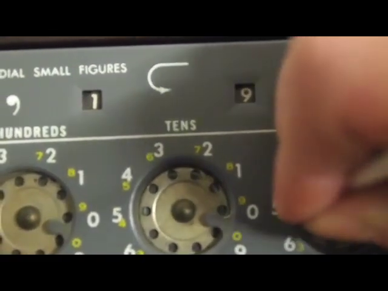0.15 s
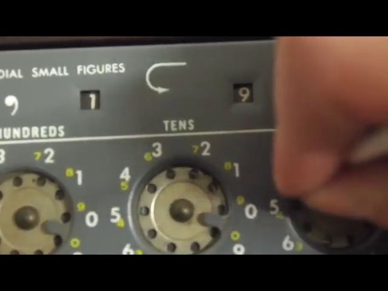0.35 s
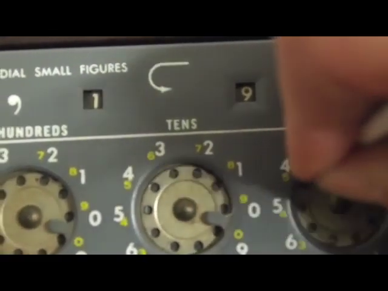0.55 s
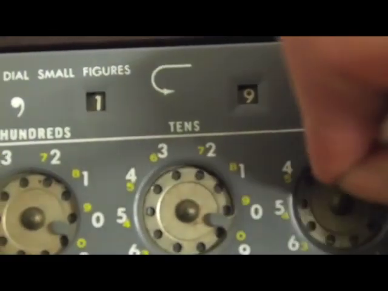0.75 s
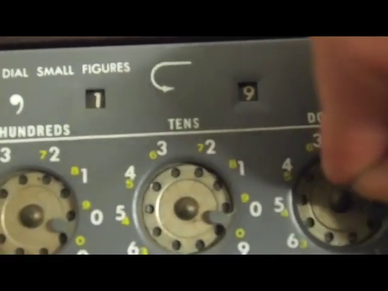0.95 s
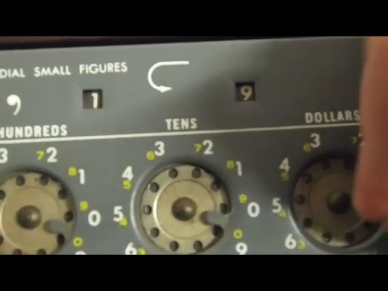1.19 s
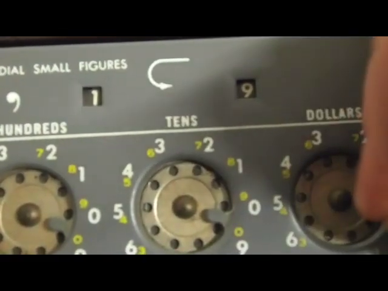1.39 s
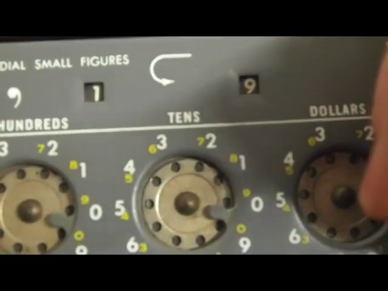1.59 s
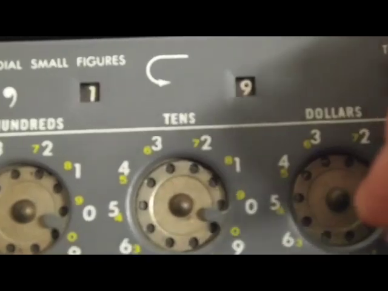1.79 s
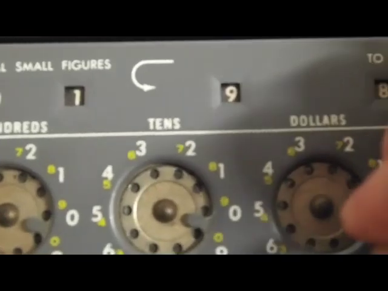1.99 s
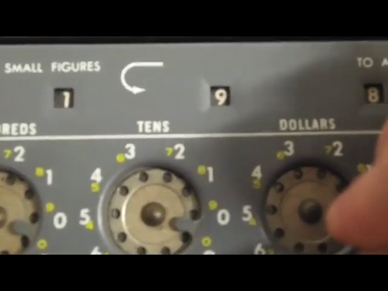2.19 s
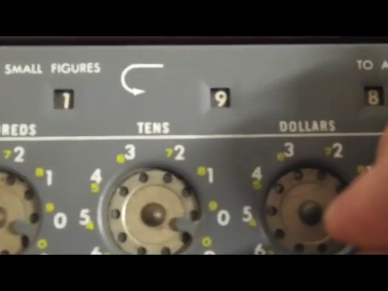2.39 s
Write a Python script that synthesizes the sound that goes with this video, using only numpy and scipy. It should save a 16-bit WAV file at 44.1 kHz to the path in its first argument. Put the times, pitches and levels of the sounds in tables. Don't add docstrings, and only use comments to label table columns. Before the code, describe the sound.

Mechanical adding machine dial ratcheting, close in a quiet room with steady microphone hiss. Sharp, irregular metal clicks and faint scraping run from 0.1 to 0.7 seconds. A hard hollow knock lands at 0.74, bright clacks at 0.82, another ringing knock at 0.92. A loud clattering burst follows at 1.1-1.27. After a pause, a soft fingertip tap at 1.77, faint rubbing, and a dull tick at 2.22.

```python
import sys
import numpy as np
from scipy import signal
from scipy.fft import rfft, irfft, next_fast_len
from scipy.io import wavfile
from scipy.ndimage import map_coordinates

SR = 44100
rng = np.random.default_rng(int(sys.argv[2]) if len(sys.argv) > 2 else 0)


def pcm_store(signal):
    levels = np.round(np.clip(np.atleast_2d(signal), -1, 1) * 32767)
    wavfile.write(sys.argv[1], SR, levels.astype(np.int16).T)


def invert_db(level):
    return 10 ** (np.asarray(level, dtype=float) / 20)


N = 108045

# [f/Hz, width/Hz, level/dB]
GEARS = [(1850, 650, -4), (3315, 800, 4), (4277, 190, 3.5), (5164, 700, 7.5), (7200, 3700, -10),
         (8540, 370, 2), (10440, 1900, -7), (11780, 5700, -4)]
FLAT_DB = -7


def unit(x):
    return x / np.sqrt(np.mean(x ** 2) + 1e-20)


def along(points, hz):
    f, v = np.transpose(points)
    return np.interp(np.log(hz + 1), np.log(f + 1), v)


def level(rows):
    s, db = np.transpose(rows)
    return invert_db(np.interp(np.arange(N) / SR, s, db, left=-150, right=-150))


def wobble(rate):
    return map_coordinates(rng.standard_normal(int(N * rate / SR) + 4), [np.arange(N) * rate / SR])


def filtered(x, response):
    m = next_fast_len(x.shape[-1] + 8192)
    spectrum = rfft(x, m) * response(np.fft.rfftfreq(m, 1 / SR))
    return irfft(spectrum, m)[..., :x.shape[-1]]


def bass_cut(f, corner_hz):
    return 1j * f / (corner_hz + 1j * f)


def body(peaks, tilt=0, extra_db=0, flat_db=-100):
    c, w, db = np.transpose(peaks)[..., None]
    gains = (-1.) ** np.arange(len(c))[:, None] * invert_db(db + extra_db)
    below = 0.29

    def response(f):
        octaves = np.log2((f + 400) / 4400)
        bend = np.maximum(octaves, 0) + below * np.minimum(octaves, 0)
        slope = invert_db(np.clip(tilt, -14, 8) * bend)
        modes = np.sum(gains * 1j * f * w / (c * c - f * f + 1j * f * w), axis=0)
        return slope * (modes + invert_db(flat_db) * bass_cut(f, 1500))

    return response


def snaps(events, peaks, ping_width, ping_db):
    spiky_db, scatter_db = 1.5, 2
    strike_t60, rise_s = 0.0024, 0.00037
    out, t = np.zeros(N + SR), np.arange(4096) / SR
    for s, db, tilt, t60, ping_hz in events:
        unevenness = np.repeat(rng.standard_normal(len(t) // 16), 16)
        spikes = rng.standard_normal(len(t)) * invert_db(spiky_db * unevenness)
        decay = invert_db(-60 * t / t60) + invert_db(-60 * t / strike_t60)
        burst = spikes * decay * (1 - np.exp(-t / rise_s))
        metal = body(peaks, tilt, scatter_db * rng.standard_normal((len(peaks), 1)), FLAT_DB)
        ping = body([(ping_hz, ping_width, ping_db)], tilt)
        ring = filtered(burst, lambda f: (metal(f) + ping(f)) * bass_cut(f, 940) ** 2)
        out[round(s * SR):][:len(t)] += invert_db(db - 9) * ring / np.sqrt(np.mean(ring[:200] ** 2))
    return out[:N]


def room(x):
    # [f/Hz, t60/s]
    decay_times = [(200, 0.32), (1500, 0.37), (5000, 0.36), (12000, 0.32)]
    delay_s = 0.004
    hz, t, z = signal.stft(rng.standard_normal(SR // 2), SR, nperseg=256)
    fading = z * invert_db(-60 * t / along(decay_times, hz)[:, None])
    tail = signal.istft(fading, SR, nperseg=256)[1]
    late = np.pad(x, (round(delay_s * SR), 0))
    return signal.fftconvolve(late, tail / np.linalg.norm(tail))[:N]


def microphone_hiss():
    # [f/Hz, level/dB per Hz]
    colour = [(15, -54), (25, -16), (309, -5), (363, -6.5), (403, -3.5), (666, -6.5), (1050, -6),
              (12600, -12.5), (14000, -8.5)]
    return invert_db(-57) * unit(filtered(rng.standard_normal(N), lambda f: invert_db(along(colour, f))))


def scrape():
    # [t/s, length/s, level/dB, tilt/dB per octave, squeak f/Hz]
    strokes = [(-.03, 0.085, -49, -3.5, 3380), (0.087, 0.18, -53.5, -8, 4020),
               (0.158, 0.028, -50.5, -4, 4300), (0.225, 0.059, -45, -12, 3140),
               (0.326, 0.13, -40.5, -7, 3080), (0.45, 0.079, -57, -8, 3200), (0.517, 0.1, -50.5, -12, 3020),
               (0.587, 0.12, -48.5, -14, 1930), (0.688, 0.061, -49, -11, 2600),
               (0.754, 0.11, -46, -6, 1630), (0.84, 0.056, -55, 13, 5300), (0.917, 0.083, -60, -15, 3400),
               (1.086, 0.034, -42.5, -4.5, 5500), (1.132, 0.052, -40.5, -11.5, 5200),
               (1.169, 0.086, -30, -3.5, 5340), (1.232, .11, -45.5, 0, 1500)]
    # [f/Hz, width/Hz, level/dB]
    shake_modes = [(45, 57, -2), (126, 22, 10), (226, 95, 0)]
    grain_db, shake_db = 2.2, -19.5
    edge = 0.36
    squeak_width_hz, squeak_db = 220, 9.5
    t, out, effort = np.arange(N) / SR, np.zeros(N), np.zeros(N)
    grains = rng.standard_normal(N) * invert_db(grain_db * (wobble(370) + wobble(99.94)))
    for s, length, db, tilt, squeak_hz in strokes:
        nearest_end = np.minimum(t - s, s + length - t)
        stroke = invert_db(db) * np.clip(nearest_end / (edge * length), 0, 1)
        teeth = body(GEARS + [(squeak_hz, squeak_width_hz, squeak_db)], tilt, 0, FLAT_DB)
        out += stroke * unit(filtered(grains, teeth))
        effort += np.sqrt(stroke * invert_db(-52.5))
    shaking = unit(filtered(rng.standard_normal(N), body(shake_modes)))
    return out + invert_db(shake_db) * effort * shaking


def case_hum():
    # [t/s, peak level/dB, f/Hz, t60/s]
    jolts = [(0, -56, 647, 0.082), (.202, -50.5, 636, .04), (.345, -48, 646, 0.064), (.41, -45, 709, 0.042),
             (.635, -47.5, 630, 0.038), (.819, -41.5, 654, 0.065), (.848, -47, 638, 0.038),
             (1.118, -51, 640, 0.075), (1.173, -36.5, 642.6, 0.093), (1.2, -44.5, 650, 0.07),
             (1.233, -39, 642, 0.079), (1.278, -41.5, 664, 0.028)]
    rise_s, rough_db = 0.0043, 3
    out, t = np.zeros(N + SR), np.arange(8192) / SR
    for s, db, hz, t60 in jolts:
        swell = invert_db(db - 60 * t / t60) * (1 - np.exp(-t / rise_s))
        out[round(s * SR):][:len(t)] += swell * np.sin(2 * np.pi * hz * t)
    return 2 * out[:N] * invert_db(rough_db * wobble(120.14))


def winding():
    # [t/s, peak level/dB, tilt/dB per octave, rattle t60/s, ping f/Hz]
    pawls = [(0.0893, -22, 1.5, 0.019, 4870), (0.0935, -27.5, 0, 0.035, 4400),
             (0.1258, -38, 3, 0.027, 2840), (0.1985, -22.5, 1, 0.05, 5800), (0.2015, -26, -5, 0.018, 4800),
             (0.2072, -30, -0.5, 0.016, 5550), (0.2298, -47, 10, 0.027, 4430), (0.245, -27, 4, 0.064, 5550),
             (0.2548, -24, 2, 0.013, 3100), (0.2568, -19.5, -0.5, 0.02, 10050),
             (0.3292, -23.5, 3.5, 0.015, 5600), (0.3444, -31.5, -5, 0.027, 3180),
             (0.3704, -30, -4.5, 0.035, 3140), (0.3875, -28, -1, 0.024, 5200),
             (0.3905, -17, -1.5, 0.025, 5240), (0.4025, -21.5, 2.5, 0.083, 5100),
             (0.41, -19.5, 0, 0.023, 4330), (0.4354, -37, 11.5, 0.029, 5560),
             (0.4544, -33.5, -3.5, 0.028, 5330), (0.4914, -29.5, 1, 0.049, 5450),
             (0.5497, -44, -10, 0.022, 2900), (0.5925, -39.5, -5, 0.039, 3070),
             (0.598, -26.5, -5, 0.023, 3020), (0.5998, -25, -6, 0.025, 4480), (0.611, -34, -4, 0.024, 4400),
             (0.6262, -29, -2, 0.036, 4860), (0.635, -17, 3, 0.036, 4270), (0.6564, -38, 6.5, 0.027, 2820),
             (0.6931, -14.5, 2, 0.036, 5320), (0.702, -24.5, -1, 0.03, 5200)]
    return snaps(pawls, GEARS, 445, 1.5)


def strike(t, modes):
    contact_s, chatter_db, chatter_t60 = 0.00005, -21, 0.075
    push = np.exp(-((t - .001) / contact_s) ** 2)
    chatter = invert_db(chatter_db - 60 * t / chatter_t60) * rng.standard_normal(len(t))
    ring = filtered(chatter + push / np.linalg.norm(push), modes)
    return ring / np.sqrt(np.mean(ring[:500] ** 2))


def stylus_knocks():
    # [t/s, peak level/dB, pitch factor, tilt/dB per octave, damping factor]
    light = [
        (0.7081, -37, 0.61, -11, 2.4),
        (0.757, -29.5, 0.84, 8.5, 1.2),
    ]
    # [t/s, peak level/dB, time until the hand damps it/s]
    firm = [
        (0.7374, -8.5, 0.1),
        (0.9178, -16.5, 2),
        (1.0083, -30, .014),
    ]
    # [f/Hz, width/Hz, level/dB]
    spots = [
        [(221, 45, -16.5), (680, 58, 14.5), (830, 173, 6.5), (995, 108, 4), (1182, 77, 4.5), (1425, 60, 0.5),
         (1650, 83, 2), (1836, 90, 5), (2510, 160, -1), (3010, 170, -6), (3400, 100, -4), (3670, 140, -2),
         (4390, 90, 2), (5500, 1200, -10.5)],
        [(213, 62, -7.5), (398, 35, -1), (633, 29.5, 8.5), (863, 114, 1.5), (1236, 184, 1.5), (1583, 75, 5),
         (1797, 98, 2.5), (2226, 120, -3), (2680, 94, -9), (3170, 120, -3.5), (3540, 180, -10.5),
         (4100, 210, -9.5), (5500, 1600, -19)],
        [(204, 120, -1.5), (405, 65, 3), (693, 91, 7), (875, 200, 0), (1160, 110, 4.5), (1410, 110, -10),
         (2160, 150, -14), (3230, 200, -12), (4100, 300, -6)],
    ]
    damped_t60, damped_db = 0.016, -11
    out, t = np.zeros(N + SR), np.arange(8192) / SR
    for s, db, pitch, tilt, damping in light:
        modes = body(np.multiply(spots[0], [pitch, damping, 1]), tilt)
        out[round((s - .001) * SR):][:len(t)] += invert_db(db - 10.5) * strike(t, modes)
    for (s, db, free_s), spot in zip(firm, spots):
        hand = invert_db(np.maximum(-60 * np.clip(t - free_s, 0, None) / damped_t60, damped_db))
        out[round((s - .001) * SR):][:len(t)] += invert_db(db - 10) * hand * strike(t, body(spot))
    return out[:N]


def table_boom(case):
    # [f/Hz, width/Hz, level/dB]
    table_modes = [(216, 127, -6)]
    return filtered(room(np.abs(case)), lambda f: body(table_modes)(f) ** 2)


def stray_ticks():
    # [t/s, peak level/dB, tilt/dB per octave, rattle t60/s, ping f/Hz]
    ticks = [
        (.7888, -28.5, -3, 0.018, 4300),
        (1.798, -42.5, 1.5, 0.031, 4140),
        (1.928, -47, 0, 0.023, 2970),
        (2.2238, -29, -9.5, 0.018, 2790),
        (2.2275, -37.5, -4, 0.03, 5170),
    ]
    # [f/Hz, width/Hz, level/dB]
    stylus_modes = [(1810, 170, 4.5), (2360, 140, 1.5), (4300, 400, -2), (5170, 250, 7), (5800, 400, 0),
                    (7200, 2500, -7)]
    return snaps(ticks, stylus_modes, 400, 10.4)


def carrying():
    # [t/s, peak level/dB, tilt/dB per octave, rattle t60/s, ping f/Hz]
    carries = [(.8125, -29, -5, 0.031, 5300), (.8172, -11.5, -2, 0.02, 3000),
               (.8205, -15.5, -3, 0.037, 5450), (.8408, -14, -4, 0.025, 5300), (.844, -17, -5, 0.032, 5280),
               (1.0905, -35, -9, 0.04, 4970), (1.0953, -23, -12, 0.033, 5500),
               (1.103, -35.5, -13, 0.026, 5570), (1.1152, -21, -6, 0.044, 5800),
               (1.1185, -20, -6.5, 0.037, 5500), (1.139, -25, -8, 0.036, 5540),
               (1.1497, -16.5, -5, 0.059, 8500), (1.1695, -11, 1, 0.026, 5280),
               (1.1718, -11.5, -3, 0.021, 7350), (1.1995, -26, -9, 0.026, 5300),
               (1.2025, -12.5, -5.5, 0.012, 5000), (1.2155, -16, -1.5, 0.046, 5300),
               (1.2302, -7.5, -0.5, 0.017, 5220), (1.2335, -11.5, 1.5, 0.017, 9200),
               (1.241, -29, -11, 0.025, 5300), (1.251, -32, 1, 0.017, 5300), (1.271, -30.5, -2, 0.03, 5060)]
    # [f/Hz, width/Hz, level/dB]
    wheel_modes = [(1290, 270, -14.5), (1690, 290, -17), (3400, 1200, -6), (4370, 300, 5), (5440, 320, 4.5),
                   (6800, 910, 1), (7350, 200, 0.5), (8160, 240, 5), (9000, 1900, -3.5), (11700, 1200, 1.5)]
    return snaps(carries, wheel_modes, 260, 4.9)


def rub():
    # [t/s, level/dB]
    strength = [
        (1.75, -65),
        (1.79, -62.5),
        (1.95, -67.5),
        (2.03, -71.5),
        (2.06, -86),
        (2.1, -64.5),
        (2.17, -65),
        (2.2, -70.5),
        (2.45, -78),
    ]
    # [f/Hz, width/Hz, level/dB]
    skin_modes = [(527, 134, 5.5), (1010, 800, -15), (303, 110, 3)]
    grains = rng.standard_normal(N) * invert_db(3.5 * wobble(60))
    return invert_db(2) * level(strength) * unit(filtered(grains, body(skin_modes)))


def fingertip_taps():
    # [t/s, peak level/dB, f/Hz]
    taps = [
        (1.766, -33, 498),
        (2.084, -50, 600),
        (2.41, -47, 552),
    ]
    # [f/Hz, width/Hz, level/dB]
    puff_modes = [(288, 140, 0), (920, 530, -2.5)]
    tap_t60, rise_s, puff_db = 0.021, 0.0045, -12.5
    out, t = np.zeros(N + SR), np.arange(8192) / SR
    for s, db, hz in taps:
        puff = unit(filtered(rng.standard_normal(len(t)), lambda f: body(puff_modes)(f) ** 2))
        tone = np.sin(2 * np.pi * hz * t) + invert_db(puff_db) * puff
        swell = invert_db(db + 15.0 - 60 * t / tap_t60) * (1 - np.exp(-(t / rise_s) ** 2))
        out[round(s * SR):][:len(t)] += swell * tone
    return out[:N]


def scene():
    hiss, scraping, hum = microphone_hiss(), scrape(), case_hum()
    wind_up, carry, strays = winding(), carrying(), stray_ticks()
    case = stylus_knocks() + fingertip_taps()
    case = case + table_boom(case)
    carry_to_room = filtered(carry, lambda f: 1 - 0.33 * body([(5300, 900, 0)])(f))
    case_to_room = filtered(case, lambda f: bass_cut(f, 890))
    wet = room(wind_up + hum / 2) + room(carry_to_room) + room(case_to_room + strays / 2)
    direct = wind_up + carry + case + strays + hum
    return (direct + invert_db(-13) * wet + scraping + rub() + hiss)[None]


def top_cut(x):
    return signal.sosfilt(signal.butter(12, 14230, fs=SR, output="sos"), x)


def record(dry):
    notch_hz, notch_width_hz, notch_left = 7820, 350, 0.106
    low_hz, top_hz, top_steepness = 102, 13160, 73

    def microphone(f):
        notch = 1 - (1 - notch_left) * body([(notch_hz, notch_width_hz, 0)])(f)
        return notch * bass_cut(f, low_hz) / (1 + (f / top_hz) ** top_steepness)

    return top_cut(filtered(dry, microphone))


dry = scene()
out = record(dry)
pcm_store(out)
```